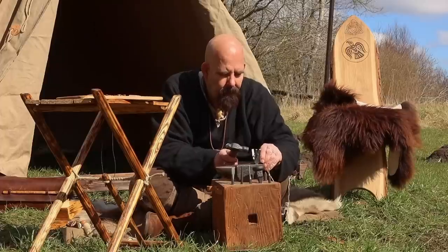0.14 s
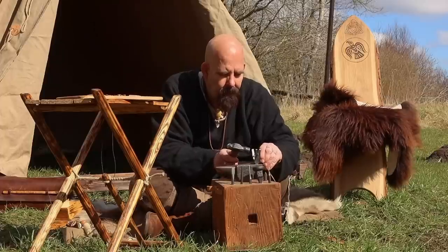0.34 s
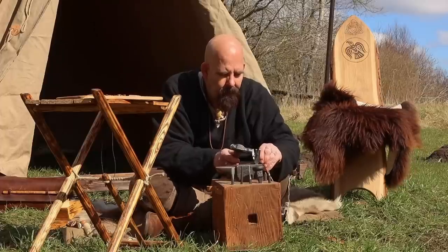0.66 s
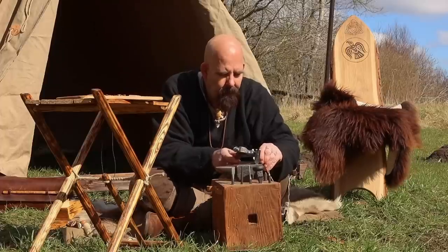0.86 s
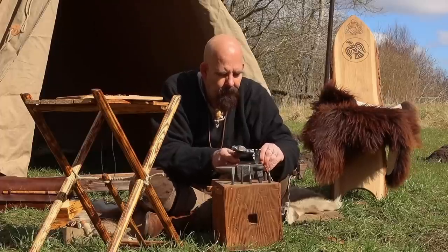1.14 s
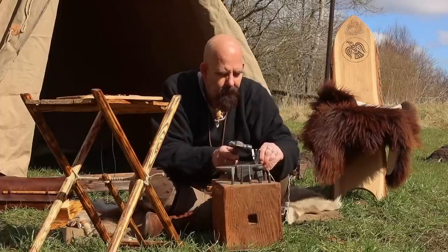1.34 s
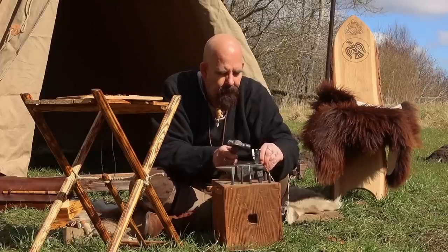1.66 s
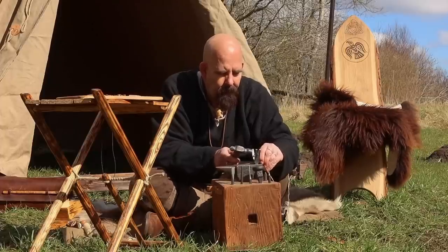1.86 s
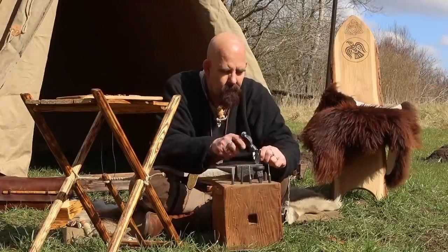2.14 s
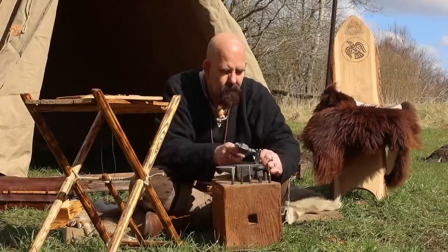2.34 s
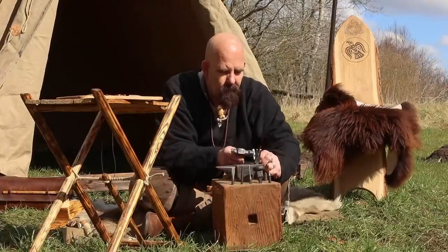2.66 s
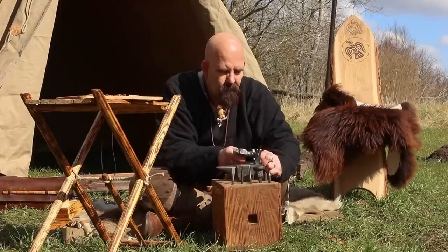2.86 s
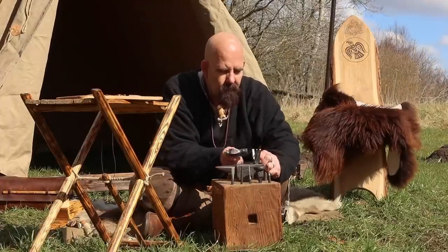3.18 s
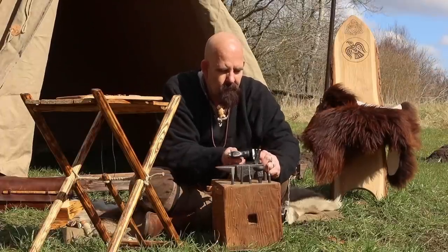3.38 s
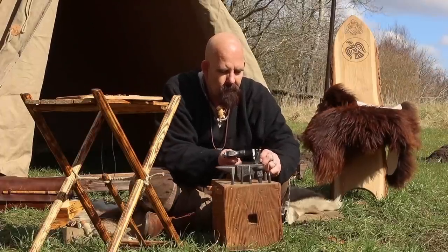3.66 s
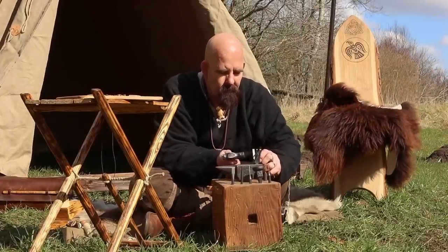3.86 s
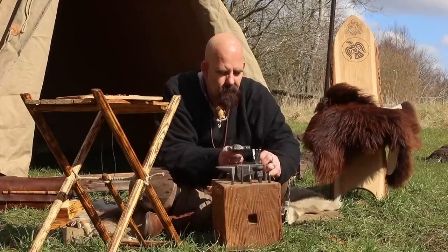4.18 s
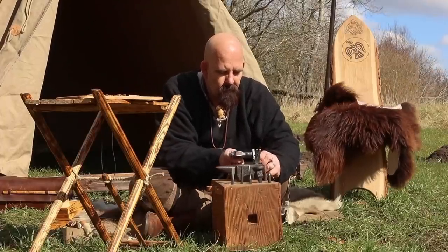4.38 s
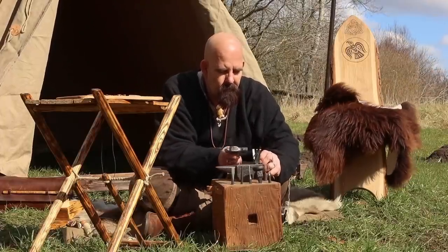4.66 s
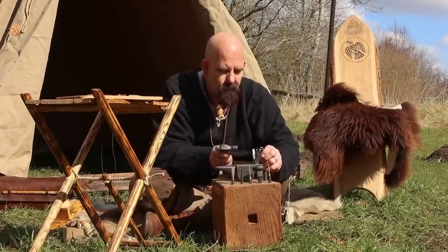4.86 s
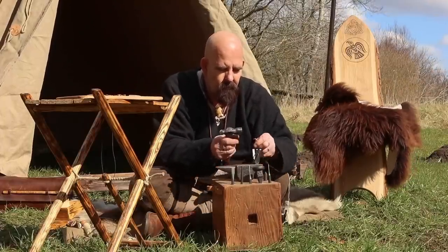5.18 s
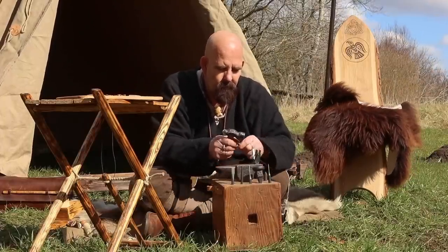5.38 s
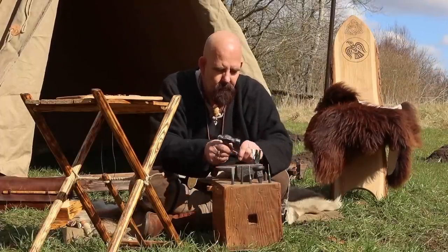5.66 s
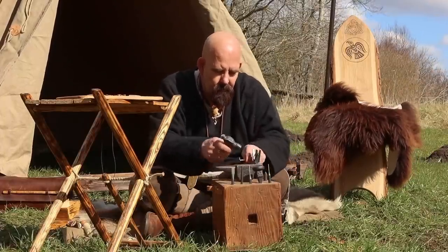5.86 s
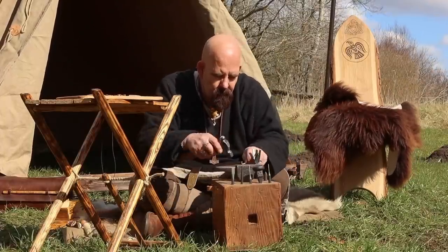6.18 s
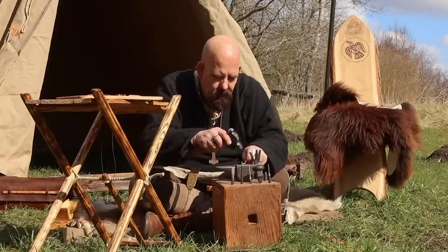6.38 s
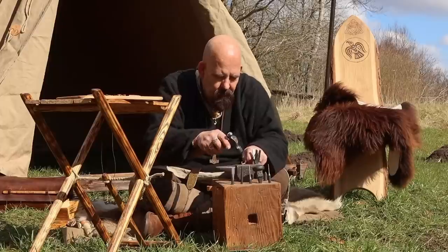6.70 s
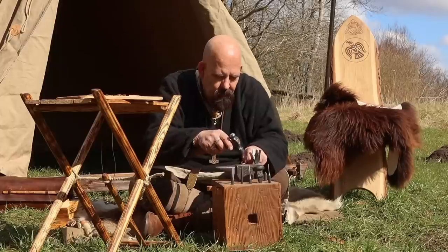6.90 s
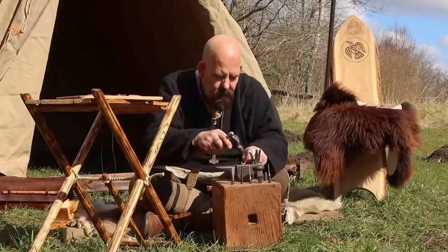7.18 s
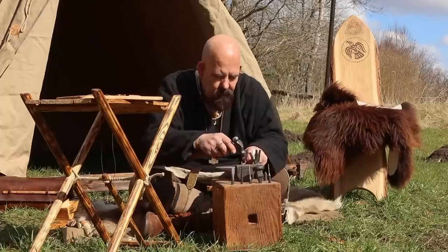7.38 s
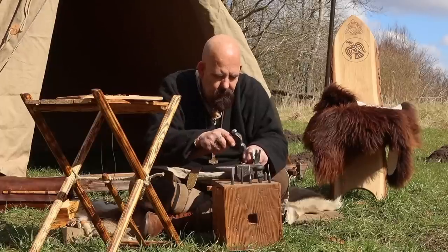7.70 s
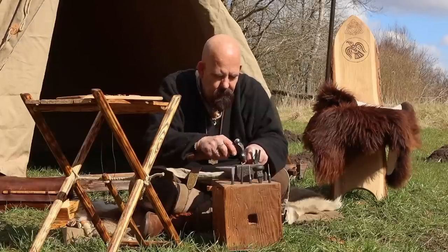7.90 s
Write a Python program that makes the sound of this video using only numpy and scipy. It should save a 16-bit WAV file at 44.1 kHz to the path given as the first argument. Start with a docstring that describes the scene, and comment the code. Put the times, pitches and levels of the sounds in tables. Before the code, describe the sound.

Outdoors by a tent, a small hammer strikes copper wire on a little steel anvil set in a wooden block. Bright, short clinks with woody knocks come about four a second, some followed by a quick bounce on bare steel. After pauses and light tool clicks, six even, duller taps finish. Low wind buffets the microphone, trees rustle, faint birds whistle, and a distant engine hums late. Close to medium distance, dry sound.

```python
"""Hammering wire on a small anvil

A small hammer works copper wire on a little steel anvil set on a wooden block, in a meadow by a tent.
Each contact sums a noise burst for the metal and fading sine waves for block, anvil and hammer head.
The head also clanks on bare steel between blows; later come even, duller peening taps.
Underneath lie light clicks, a dull echo, small birds (whistled sines), wind, rustle and hiss (filtered
noise) and a far engine (a wandering hum)."""
import sys
import numpy as np
from scipy import signal
from scipy.fft import rfft, irfft, next_fast_len
from scipy.io import wavfile

SR = 44100
rng = np.random.default_rng(int(sys.argv[2]) if len(sys.argv) > 2 else 0)


def master(y):
    """Save y as 16-bit WAV."""
    cut = np.clip(np.atleast_2d(y).T, -1, 1)
    pcm = np.round(cut * 32767)  # scale
    wavfile.write(sys.argv[1], SR, pcm.astype(np.int16))


N = 354563   # length in samples
TIME = np.arange(N) / SR   # seconds
AGE = np.arange(SR // 2) / SR   # seconds since a contact
CUTOFF_HZ = 16100   # top of the sound
BLOW, REBOUND, PEEN = 0, 1, 2   # kinds of contact, in the order of the table columns

# Names ending in t60 are the seconds a sound takes to fall by 60 dB.


def from_db(db):
    """Turn decibels into a multiplying factor."""
    return 10 ** (np.asarray(db) / 20)


def rms_one(x):
    """Scale to an rms (average strength) of 1."""
    return x / np.sqrt(np.mean(x ** 2) + 1e-20)


def at_level(x, db):
    """Scale a hit so that its first 20 ms have this rms level."""
    start_rms = np.sqrt(np.mean(x[:SR // 50] ** 2) + 1e-20)
    return x * from_db(db) / start_rms


def in_time(rows):
    """Draw straight lines between (time, value) points, giving a value at every sample."""
    s, values = np.transpose(rows)
    return np.interp(TIME, s, values)


def cut(x, hz, kind, order=2):
    """Keep the lows, the highs or a band with a Butterworth filter."""
    return signal.sosfilt(signal.butter(order, hz, kind, fs=SR, output="sos"), x)


def coloured(x, spectrum):
    """Filter x to follow a (f/Hz, level/dB) curve, with no sound ahead of its cause (minimum phase)."""
    size = 2 * next_fast_len(len(x) // 2 + 1)
    hz, db = np.transpose(spectrum)
    bins_hz = np.fft.rfftfreq(size, 1 / SR)
    gain = from_db(np.interp(np.log(bins_hz + 1), np.log(hz), db))
    # folding the cepstrum onto positive times gives the minimum-phase filter
    cepstrum = irfft(np.log(gain))
    cepstrum[1:size // 2] *= 2
    cepstrum[size // 2 + 1:] = 0
    return irfft(rfft(x, size) * np.exp(rfft(cepstrum)))[:len(x)]


def drift(rate):
    """Smooth random wander of rms 1, with this many new random points per second."""
    knots = rng.standard_normal(N // 100)
    return rms_one(np.interp(TIME * rate, np.arange(len(knots)), knots))


def dying(t60):
    """Loudness curve that falls by 60 dB in t60 seconds."""
    return np.exp(-np.log(1000) * AGE / t60)


def mode(hz, db, t60):
    """One struck resonance: a sine wave that dies away."""
    return from_db(db) * dying(t60) * np.sin(2 * np.pi * hz * AGE)


def delayed(x, s):
    """The same sound, s seconds later."""
    samples = np.arange(len(x))
    return np.interp(samples - s * SR, samples, x, left=0)


def add(track, s, sound):
    """Mix a sound into the track at time s."""
    start = max(0, round(s * SR))
    track[start:start + len(sound)] += sound[:N - start]


def wire_blows():
    """The hammer strikes the wire: soft copper cushions the contact."""
    # each blow, compared with an ordinary one: [t/s, force/dB, hardness/dB, anvil freedom/dB]
    blow_rows = [(0.0, -4, 1.5, -7.5), (0.666, -0.5, -4.5, 6), (0.893, -1.5, -1.5, 2.5),
                 (1.1733, -5, -2.5, 5.5), (1.6408, 1.5, 0, -3.5), (1.8737, 2.5, 0, 0.5),
                 (2.158, 13.5, -4, -18), (2.434, -16.5, 8, 16), (2.664, 0, 3, -3.5), (2.8964, 0.5, 4, 7),
                 (3.1326, 3.5, 5, -16), (3.3512, 6, 7, -18.5), (4.3704, 6, -4, 2.5), (4.614, 2.5, 2, -10)]
    # colour of the metal burst: [f/Hz, level/dB]
    blow_colour = [(1300, -9.5), (1900, 1), (2400, -1.5), (3000, -7.5), (3900, -3.5), (4700, -6.5),
                   (5300, -4.5), (6500, -18.5), (8200, 2.5), (10500, -11.5), (13000, 3.5), (15500, -14)]
    return hammering(blow_rows, blow_colour, BLOW, lag_s=0.00094, uneven_db=6.0,
                     rattle_db=-6, rattle_t60=0.048, t60=0.02, tail_t60=0.19)


def head_rebounds():
    """The head drops back on the bare anvil: steel on steel."""
    # each drop, compared with an ordinary one: [t/s, force/dB, hardness/dB, anvil freedom/dB]
    rebound_rows = [(0.034, 0.5, -3.5, 9.5), (0.6886, 2.5, -14, 5), (0.9384, 0.5, -10, 8.5),
                    (2.178, -6, -5, 4), (2.6793, 2, 9, 2), (2.7253, -3, -25, 10.5), (2.9528, 5, -5.5, 7),
                    (3.1738, 2.5, 9.5, 2), (3.1805, -3.5, 7.5, -7), (3.4028, 1.5, 5.5, 2.5),
                    (3.4092, -4, 3, -3), (4.3722, 4, -4.5, 10.5), (4.6584, -1, -8, 11.5)]
    # colour of the metal burst: [f/Hz, level/dB]
    rebound_colour = [(1300, -33), (2000, 17.5), (2400, -6), (3000, -14.5), (4000, -10), (4700, -15),
                      (5500, -13), (6500, -33), (8000, -15.5), (10800, -37.5), (13000, -19), (15500, -38)]
    return hammering(rebound_rows, rebound_colour, REBOUND, lag_s=0.00041, uneven_db=0.5,
                     rattle_db=-5, rattle_t60=0.055, t60=0.016, tail_t60=0.15)


def peening_taps():
    """Even, duller taps: a short metal burst with a very short tail."""
    # each tap, compared with an ordinary one: [t/s, force/dB, hardness/dB, anvil freedom/dB]
    peen_rows = [(6.591, -8, 9, -4.5), (6.8604, -2, 1.5, 3.5), (7.1173, 0, 1, 1), (7.3762, 3.5, -0.5, 5),
                 (7.6478, 2.5, -2, 1.5), (7.937, 1, 1.5, 4)]
    # colour of the metal burst: [f/Hz, level/dB]
    peen_colour = [(1300, -14), (1700, -13), (2250, 3), (2700, -13.5), (3900, -15), (4700, -19),
                   (5500, -27), (6500, -26), (8000, -19), (10500, -28), (13000, -19), (15500, -35)]
    return hammering(peen_rows, peen_colour, PEEN, lag_s=0.00088, uneven_db=3.5,
                     rattle_db=-7.5, rattle_t60=0.045, t60=0.017, tail_t60=0.033)


def hammering(rows, colour, kind, lag_s, uneven_db, rattle_db, rattle_t60, t60, tail_t60):
    """Each contact of one kind sounds the metal surface, the wooden block, the anvil and the head."""
    # how many times faster the anvil dies: [blow, rebound, peening tap]
    anvil_damping = (1.5, 1.25, .42)
    track = np.zeros(N)
    for s, *stroke in rows:
        db = part_levels(kind, *stroke)
        wood = block(kind, db["thud"], db["knock"], lag_s, uneven_db, rattle_db, rattle_t60)
        metal = contact(colour, db["crack"], db["clank"], db["sizzle"], t60, tail_t60)
        steel = anvil(kind, db["anvil ring"], db["clank"], db["sizzle"], anvil_damping[kind])
        hammer = head([db["head low"], db["head middle"], db["head high"]])
        add(track, s, wood + metal + steel + hammer)
    return track


def part_levels(kind, force_db, hardness_db, freedom_db):
    """Force raises every part, hardness the bright ones; a free anvil rings more and knocks the block less."""
    # level of each part: [ordinary blow/dB, ordinary rebound/dB, ordinary peening tap/dB,
    #                      dB per dB of force, dB per dB of hardness, dB per dB of freedom]
    response = {"thud": (-37.5, -34.5, -33, 0.66, 0, 0), "knock": (-40, -39.5, -37, 0.76, 0, -0.49),
                "crack": (-43.5, -47.5, -40.5, 0.96, 0.34, 0.07),
                "clank": (-46.5, -45, -58, 1.4, 1.02, 0.02), "sizzle": (-44.5, -43, -54.5, 1, 1, 0),
                "anvil ring": (-31.5, -38, -52, 1.5, 0, 0.8), "head low": (-50, -54, -65, 1.95, 0.98, 0.83),
                "head middle": (-59.5, -47, -65, 1.4, 1.08, -0.34),
                "head high": (-58, -54, -60, 2.1, 0.7, 0.3)}
    levels = {}
    for part, (*ordinary_db, by_force, by_hardness, by_freedom) in response.items():
        change_db = by_force * force_db + by_hardness * hardness_db + by_freedom * freedom_db
        levels[part] = ordinary_db[kind] + change_db
    return levels


def contact(colour, crack_db, clank_db, sizzle_db, t60, tail_t60):
    """A sharp snap sets off dense, quickly damped metal vibration, and a faint tail follows."""
    tail = from_db(-22) * dying(tail_t60)
    shake = rng.standard_normal(len(AGE)) * (dying(t60) + tail)
    shake[0] += 4.7   # the snap
    burst = coloured(shake, colour)
    crack = cut(burst, [1250, 3900], "band", order=4)
    clank = cut(burst, [4400, 6500], "band", order=4)
    sizzle = cut(burst, 5600, "high", order=6)
    return at_level(crack, crack_db) + at_level(clank, clank_db) + at_level(sizzle, sizzle_db)


def block(kind, thud_db, knock_db, lag_s, uneven_db, rattle_db, rattle_t60, detune=0.017):
    """The block takes the momentum just after the contact: a low thud, a hollow knock and a little rattle."""
    # wooden block, typical modes with levels relative to each other:
    # [f/Hz, t60/s, blow level/dB, rebound level/dB, peening tap level/dB]
    wood_modes = [(86, 0.3, -21, -25, -20.5), (212, 0.025, -1, -39, -0.5), (305.4, 0.049, -2.5, -8, 0),
                  (375, 0.043, -1, 2, -39), (459, 0.01, -2.5, 2.5, 7), (591, 0.031, -1, -10.5, -3.5),
                  (737, 0.029, 3.5, -1, -10.5), (855, 0.052, -2, -10, -11), (954, 0.025, -2.5, -2.5, -10.5),
                  (1173, 0.031, -12.5, -5.5, -19)]
    modes = []
    for k, (hz, t60, *drive_db) in enumerate(wood_modes):
        mode_hz = hz * (1 + detune * rng.standard_normal())
        mode_db = drive_db[kind] + uneven_db * rng.standard_normal()
        modes.append((-1) ** k * mode(mode_hz, mode_db, t60))   # neighbours start in opposite directions
    half = len(modes) // 2
    rattle = rng.standard_normal(len(AGE)) * dying(rattle_t60)
    low_rattle = cut(rattle, [220, 550], "band")
    high_rattle = cut(rattle, [550, 1300], "band")
    thud = at_level(sum(modes[:half]), thud_db) + at_level(low_rattle, thud_db + rattle_db)
    hollow = cut(sum(modes[half:]), 235, "high")
    knock = at_level(hollow, knock_db) + at_level(high_rattle, knock_db + rattle_db)
    return delayed(cut(thud + knock, 2230, "low"), lag_s)


def anvil(kind, ring_db, clank_db, sizzle_db, damping, uneven_db=5.0):
    """The two lowest pairs of modes sing, higher ones follow the contact's sharpness; damping sets how long all
    of them ring."""
    # steel anvil, typical modes with levels relative to their part:
    # [f/Hz, t60 before damping/s, blow level/dB, rebound level/dB, peening tap level/dB]
    steel_modes = [(4654, .088, -6, -9, 0), (4708, .07, -9, -2, -30), (5110, .045, -10, -6, -28),
                   (5186, .075, -15, -13, -8), (5620, .055, -21, -10, -15), (5917, .065, -9, -11, -6),
                   (7990, .05, -20, -15, -13), (8380, .07, -13, -12, -15), (9850, .055, -16, -18, -4),
                   (11260, .07, -16, -19, -20), (11600, .1, -19, -24, -20), (12490, .055, -20, -17, 0)]
    ringing = np.zeros(len(AGE))
    for hz, t60, *drive_db in steel_modes:
        if hz < 5400:
            part_db = ring_db
        elif hz < 6500:
            part_db = clank_db
        else:
            part_db = sizzle_db
        mode_hz = hz + 5 * rng.normal()
        mode_db = part_db + drive_db[kind] + uneven_db * rng.normal()
        ringing += mode(mode_hz, mode_db, t60 / damping)
    return ringing


def head(levels_db, grip_hz=(2, 14, 3)):
    """The hammer head rings on in three thin modes, whose pitch shifts slightly with grip and contact."""
    # hammer head, low, middle and high mode: [typical f/Hz]
    hammer_hz = [7172, 7530, 14098]
    # dying time of the same three modes: [t60/s]
    hammer_t60 = [.2, .25, .13]
    ringing = np.zeros(len(AGE))
    for hz, shift_hz, db, t60 in zip(hammer_hz, grip_hz, levels_db, hammer_t60):
        ringing += mode(hz + shift_hz * rng.normal(), db, t60)
    return ringing


def tool_clicks(level_db=-17, t60=0.011, spread=1.07, head_db=-31, anvil_db=-21):
    """Wire and tools touch lightly: short noise bursts that barely wake the steel."""
    # light clicks: [t/s, strength before the shifts above/dB, middle f/Hz]
    click_rows = [(1.7553, -42, 7000), (1.932, -44, 7180), (2.205, -30.5, 2020), (2.871, -45, 4690),
                  (5.247, -41, 8460), (5.9907, -29, 7460), (6.111, -39.5, 8140)]
    track = np.zeros(N)
    for s, db, hz in click_rows:
        noise = rng.standard_normal(len(AGE)) * dying(t60)
        burst = cut(noise, [hz / spread, min(hz * spread, CUTOFF_HZ)], "band", order=1)
        hammer = from_db(head_db) * head([db - 12, db, db - 20])
        steel = from_db(anvil_db) * anvil(BLOW, db - 12, db, db - 4, damping=0.48)
        add(track, s, at_level(burst, db + level_db) + hammer + steel)
    return track


def tent_echo(work, echo_s=0.0265, echo_db=-17, echo_hz=800):
    """The tent sends back one late, weak copy of the work with its treble dulled."""
    return from_db(echo_db) * cut(delayed(work, echo_s), echo_hz, "low", order=1)


def birds(waver=0.011, flutter_db=4.0):
    """Thin, faint whistles: sine waves that glide, waver in pitch and flutter in loudness."""
    # far birds, before waver and flutter: [t/s, length/s, start f/Hz, end f/Hz, level/dB]
    bird_calls = [(3.756, 0.12, 4850, 5350, -64), (3.982, 0.21, 3690, 3760, -60),
                  (4.09, 0.196, 4480, 4600, -62), (4.754, 0.061, 4570, 4700, -63),
                  (4.8, 0.076, 5060, 5140, -67), (4.92, .08, 4330, 4280, -70),
                  (6.086, 0.16, 4300, 4330, -67), (6.62, 0.43, 8020, 7840, -65),
                  (6.98, 0.47, 7960, 7800, -69), (7.917, .2, 7950, 8000, -61)]
    track = np.zeros(N)
    for s, length, start_hz, end_hz, db in bird_calls:
        count = int(length * SR)
        hz = np.linspace(start_hz, end_hz, count) * (1 + waver * drift(256)[:count])
        flutter = from_db(db + flutter_db * drift(75)[:count])
        loudness = flutter * np.hanning(count)   # swells and fades
        add(track, s, loudness * np.sin(2 * np.pi * np.cumsum(hz) / SR))
    return track


def wind(shift_db=1.0, lumps_db=-1.1):
    """Wind buffets the microphone: deep noise that swells with the gusts."""
    # colour of the wind: [f/Hz, level/dB]
    wind_colour = [(15, -7.5), (35, -0.5), (70, -4), (110, -9), (180, -17), (350, -33.5), (800, -58)]
    # gusts, before shift and lumps: [t/s, level/dB]
    gust_curve = [(0.0, -49), (0.2, -45), (0.87, -49.5), (1.03, -54), (1.32, -62), (2.01, -51), (2.66, -51),
                  (2.89, -47), (3.29, -47.5), (3.47, -42), (4.28, -47), (4.48, -48.5), (5.1, -52),
                  (5.49, -57), (7.43, -61.5), (8.04, -47.5)]
    noise = rms_one(coloured(rng.standard_normal(N), wind_colour))
    return noise * from_db(in_time(gust_curve) + shift_db + lumps_db * drift(14))


def trees(shift_db=3.5, flutter_db=0.08):
    """Rustling trees: noise with a slowly changing level and a very slight flutter."""
    # colour of the trees: [f/Hz, level/dB]
    tree_colour = [(90, 1), (170, 0), (300, -1), (550, -4), (1000, -3.5), (1400, -8), (2000, -14),
                   (3500, -20.5), (8000, -28)]
    # rustle, before shift and flutter: [t/s, level/dB]
    rustle_curve = [(0.0, -53.5), (0.18, -56), (1.77, -53), (2.24, -57), (3.36, -55), (6.96, -58),
                    (8.04, -57)]
    noise = rms_one(coloured(rng.standard_normal(N), tree_colour))
    return noise * from_db(in_time(rustle_curve) + shift_db + flutter_db * drift(16))


def even_hiss(level_db=-61):
    """A steady hiss of filtered noise."""
    # colour of the hiss: [f/Hz, level/dB]
    hiss_colour = [(300, -34), (2000, -3.5), (4300, -3), (6000, -4), (8000, -4.5), (12000, -6),
                   (15500, -10.5)]
    return rms_one(coloured(rng.standard_normal(N), hiss_colour)) * from_db(level_db)


def far_engine(hum_hz=161.5):
    """A far engine hums around one pitch, wandering in strength and phase as it fades in and out."""
    # loudness of the hum: [t/s, level/dB]
    engine_curve = [(0, -82), (5.2, -64.5), (5.5, -61), (6.2, -59), (7.0, -55.5), (7.4, -67.5), (8.04, -61)]
    phase = 2 * np.pi * hum_hz * TIME
    hum = drift(9.1) * np.sin(phase) + drift(17) * np.cos(phase)
    return hum * from_db(in_time(engine_curve))


def scene():
    """The work, its echo and the meadow; both channels are alike."""
    work = wire_blows() + head_rebounds() + peening_taps() + tool_clicks()
    meadow = birds() + wind() + trees() + even_hiss() + far_engine()
    return np.tile(work + tent_echo(work) + meadow, (2, 1))


def record(dry):
    """A steep low-pass filter removes the very top."""
    steep = signal.ellip(10, 0.1, 80, CUTOFF_HZ, fs=SR, output="sos")   # 0.1 dB ripple, 80 dB cut
    return signal.sosfilt(steep, dry)


dry = scene()
out = record(dry)
master(out)
```